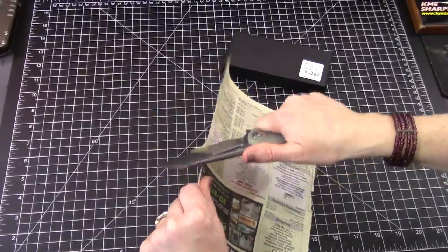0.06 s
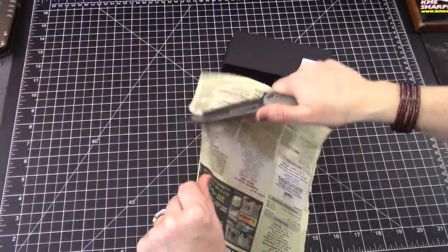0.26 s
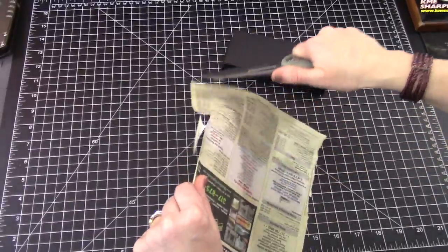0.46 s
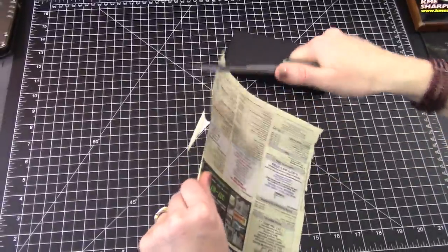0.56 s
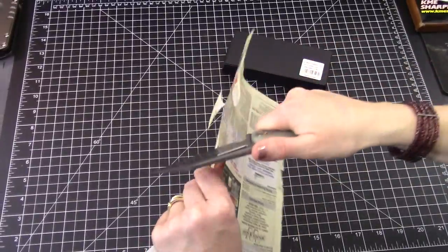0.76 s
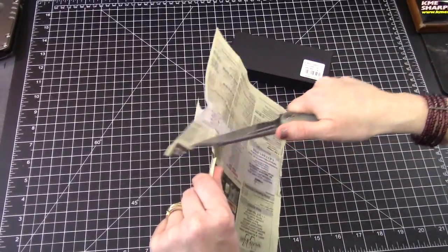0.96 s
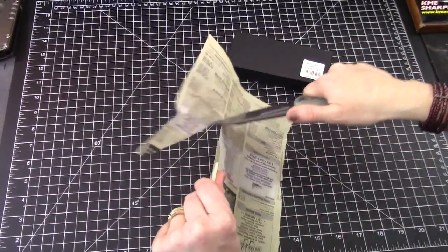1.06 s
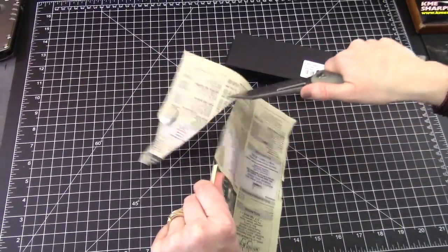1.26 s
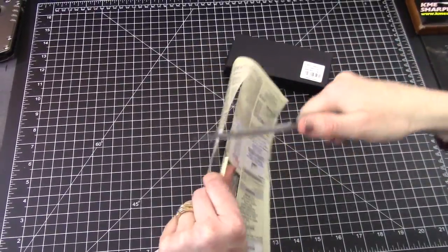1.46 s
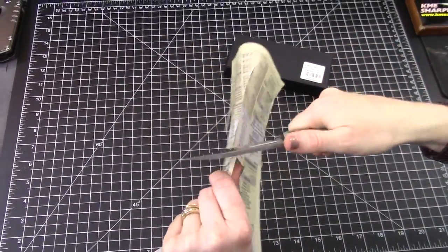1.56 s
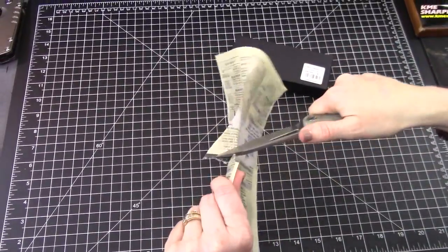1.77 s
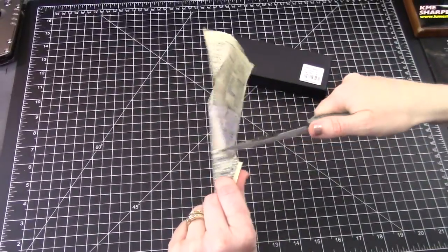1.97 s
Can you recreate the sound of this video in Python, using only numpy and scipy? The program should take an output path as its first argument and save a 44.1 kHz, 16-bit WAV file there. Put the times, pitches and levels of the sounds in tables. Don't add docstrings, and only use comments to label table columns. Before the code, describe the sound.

A knife slices thin newsprint, close and dry in a small quiet room. The first stroke is already under way at 0 s, builds to its hardest rip around 0.3 and fades by 0.5. Faint paper stirring follows, blade ticks at 0.77, then a bright steady slice from 0.84 to 1.27. The sheet settles; a lighter, uneven, snapping cut runs from 1.64 to about 2 s.

```python
import sys
import numpy as np
from scipy import signal
from scipy.fft import rfft, irfft
from scipy.io import wavfile
from scipy.ndimage import uniform_filter1d, map_coordinates

SR = 44100
rng = np.random.default_rng(int(sys.argv[2]) if len(sys.argv) > 2 else 0)


def int16_out(signal):
    q = np.round(np.clip(np.atleast_2d(signal).T, -1, 1) * 32767)
    wavfile.write(sys.argv[1], SR, q.astype(np.int16))


def gain_from_db(level_db):
    decades = np.asarray(level_db, float) / 20
    return 10 ** decades


N = 89037
SILENT_DB = -90


def unit(x):
    return x / np.sqrt(np.mean(x ** 2) + 1e-20)


def along(points, hz):
    f, v = np.transpose(points)
    return np.interp(np.log(hz + 1), np.log(f + 1), v)


def wobble(rate):
    return map_coordinates(rng.standard_normal(4000), [np.arange(N) * rate / SR])


def colour(x, points):
    gain = gain_from_db(along(points, np.fft.rfftfreq(4096, 1 / SR)))
    cepstrum = irfft(np.log(gain + 1e-6))
    cepstrum[1:2048] *= 2
    cepstrum[2049:] = 0
    return signal.fftconvolve(x, irfft(np.exp(rfft(cepstrum))))[:N]


def patches(x, patchy_db):
    z = signal.stft(x, nperseg=256)[2]
    field = uniform_filter1d(rng.standard_normal(z.shape), 3, 0)
    field = uniform_filter1d(field, 6, 1)
    return signal.istft(z * gain_from_db(patchy_db * unit(field)), nperseg=256)[1][:N]


def cracks(spike_db, clump_db, clump_rate):
    spikes = spike_db * np.minimum(rng.exponential(size=N), 4)
    clumps = clump_db * wobble(clump_rate)
    return rng.standard_normal(N) * gain_from_db(spikes + clumps)


RING_SPOTS_HZ = [1540, 1875, 2005, 2300, 2510, 2700]


def resonate(x, ring_hz, gain_db):
    width_hz = 420
    f, z = np.fft.rfftfreq(N, 1 / SR), rfft(x)
    place = np.interp(ring_hz, RING_SPOTS_HZ, np.arange(len(RING_SPOTS_HZ)))
    ringing = np.zeros(N)
    for k, centre in enumerate(RING_SPOTS_HZ):
        damping = 1j * f * width_hz
        peak = irfft(z * damping / (centre * centre - f * f + damping), N)
        ringing += np.sqrt(np.clip(1 - abs(place - k), 0, 1)) * peak
    return x + gain_from_db(gain_db) * ringing


# [t/s, cutting force level/dB, edge brightness level/dB,
# sheet flex level/dB, sheet ring f/Hz]
FIRST_STROKE = [
    [(0.0, -33, -19, 4.5, 1970), (.04, -26, -7.5, -10.5, 2250), (.07, -26.5, -5, -7.5, 2180),
     (.135, -23, -5, -10, 2210), (.2, -19.5, -5.5, -14.5, 1990), (.26, -20, -2.5, -13.5, 1940)],
    [(.266, -13, -4, -15, 2190), (.29, -12.5, -4, -20, 2080), (.32, -15.5, -10, -7, 2410),
     (.345, -13.5, -2, -16.5, 2700), (.375, -18.5, -5, -13.5, 2800), (.403, -29.5, -7.5, -3, 2360)],
    [(.425, -37.5, -27, 2.5, 2080), (.455, -31, -21, -17, 2340), (.475, -42.5, -30, 0, 2300),
     (.54, -64, -24, -5, 2100)],
]
SECOND_STROKE = [
    [(.8445, -16.5, -3.5, -23.5, 2720), (.885, -19.5, -4, -28, 2430), (.926, -23, -3.5, -19.5, 2370),
     (.995, -15.5, -4.5, -16, 1990), (1.06, -16.5, -4.5, -13, 2250)],
    [(1.088, -16, -5.5, -14.5, 2020), (1.15, -17.5, -6.5, -14.5, 2000), (1.225, -14.5, -6, -18, 2300),
     (1.243, -22, -4, -14.5, 2180), (1.265, -29.5, -7, -10.5, 2150)],
    [(1.3, -40.5, -20, -7.5, 1840), (1.325, -39, -25, -6, 1720), (1.385, -49.5, -14.5, 1, 1830),
     (1.43, -59, -10, 4, 1960)],
]
THIRD_STROKE = [
    [(1.643, -43, 2, -11, 2350), (1.653, -21, -2.5, -13, 2050), (1.71, -21, -3, -10.5, 1510),
     (1.79, -28, -0.5, -12, 2450), (1.825, -27.5, -5, -6.5, 1810)],
    [(1.86, -36.5, -1, -13.5, 1950), (1.89, -23.5, -3, -16, 2250), (1.92, -28.5, -3.5, -10, 1930),
     (1.952, -42, -7.5, -4, 1860), (1.975, -31, -5.5, -26, 1790), (1.99, -34.5, -7, -16, 2230),
     (2.019, -29, -13, 0, 2300)],
]


def stroke_curves():
    rows = []
    for phase in FIRST_STROKE + SECOND_STROKE + THIRD_STROKE:
        if rows and phase[0][0] - rows[-1][0] > .1:
            rows.append((rows[-1][0] + .03, SILENT_DB, *rows[-1][2:]))
            rows.append((phase[0][0] - .003, SILENT_DB, *phase[0][2:]))
        rows += [tuple(r) for r in phase]
    s, *columns = np.transpose(rows)
    return [np.interp(np.arange(N) / SR, s, c) for c in columns]


# [f/Hz, level/dB]
SHEET_TONE = [(500, -28.5), (1100, -3), (1600, -1), (2500, -5.5), (4000, -0.5), (5500, -13.5), (9000, -37)]
# [f/Hz, level/dB]
FIBRE_TONE = [(1000, -22), (2500, 1.5), (4000, -2), (6000, 0.5), (8000, -0.5), (11000, -7), (14000, -45),
              (16000, -46)]
# [f/Hz, level/dB]
FLEX_TONE = [(80, -29), (180, -13.5), (330, 6), (500, 1), (800, 2), (1200, -5), (2500, -15)]
# [f/Hz, level/dB]
SIZZLE_TONE = [(5000, -22), (9000, -6.5), (12000, -6), (16000, -14)]


def cut():
    force_db, bright_db, flex_db, ring_hz = stroke_curves()
    slip_db = force_db + 0.5 * wobble(61.6) + 0.19 * wobble(250)

    ring = colour(cracks(spike_db=2.5, clump_db=2.26, clump_rate=550), SHEET_TONE)
    ring_gain_db = 7.5 - 0.39 * np.clip(bright_db, -12, 0)
    ring = unit(patches(resonate(ring, ring_hz, ring_gain_db), patchy_db=2.5))

    hiss = colour(cracks(spike_db=0, clump_db=1.0, clump_rate=250), FIBRE_TONE)
    hiss = unit(patches(hiss, patchy_db=1.0))
    sizzle = unit(colour(cracks(spike_db=2.5, clump_db=4.5, clump_rate=200), SIZZLE_TONE))
    hiss = hiss + gain_from_db(5.5 + 4.7 * np.minimum(bright_db, 0)) * sizzle

    flex = colour(cracks(spike_db=0, clump_db=1.0, clump_rate=60), FLEX_TONE)
    flex = unit(patches(flex, patchy_db=1.5))

    dull = np.sqrt(np.clip(1 - 2.0 * gain_from_db(2 * bright_db), .1, 1))
    ring = gain_from_db(slip_db - 0.2) * dull * ring
    return ring + gain_from_db(slip_db - 2.25 + bright_db) * hiss + gain_from_db(slip_db + flex_db) * flex


# [t/s, peak level/dB]
PRICKS = [(0.1054, -14), (.1384, -18.5), (.1658, -13), (0.2, -11), (.2104, -27), (0.2302, -10),
          (0.2497, -21), (0.2713, -11), (0.2882, -20), (0.3183, 1), (0.3226, -17), (0.351, -10),
          (.3643, -9), (0.4073, -22), (0.4092, -19), (0.459, -28), (.8584, -28), (0.8704, -24),
          (.9283, -14), (.9437, -21), (0.9727, -22), (0.9902, -8.5), (1.0025, -14), (1.0319, -7),
          (1.0426, -27), (1.0713, -8), (1.078, -9), (1.0832, -6.5), (1.0878, -7), (1.093, -7.5),
          (1.1137, -14), (1.1195, -19), (1.1353, -3), (1.1473, -10), (1.166, -13), (1.1728, -7.5),
          (1.2068, -17), (1.227, -10), (1.6517, -17), (1.7066, -15), (1.7469, -31), (1.777, -22),
          (1.7914, -21), (1.991, -27), (2.007, -29)]
# [f/Hz, level/dB]
SPLIT_TONE = [(1500, -23), (4000, -8), (6500, 0.5), (10000, -3.5), (13000, -11), (16000, -22)]


def pricks():
    ring_hz, ring_t60_s = 2250, 0.0062
    edge_db, edge_t60_s = -0.5, 0.0065
    out, t = np.zeros(N + SR), np.arange(500) / SR
    for s, db in PRICKS:
        tune, sign = rng.standard_normal(2)
        ring = np.sin(2 * np.pi * ring_hz * (1 + .12 * tune) * t)
        ring *= gain_from_db(-60 * t / ring_t60_s) * (1 - np.exp(-t / .0003))
        edge = colour(rng.standard_normal(len(t)), SPLIT_TONE)[:len(t)]
        edge *= gain_from_db(edge_db - 60 * t / edge_t60_s)
        out[round(s * SR) - 8:][:len(t)] += gain_from_db(db) * (np.sign(sign) * ring + edge)
    return out[:N]


# [t/s, peak level/dB, brightness level/dB]
SNAPS = [(0.1384, -1.5, -17), (0.184, -7, -9.5), (0.1974, -9, -11), (0.264, -17, -9), (0.2678, -4.5, -1.5),
         (0.3268, 0.5, -4), (0.3522, -10, 0), (0.3695, -4.5, -4.5), (0.4064, -1, -40), (0.432, -12, -19),
         (0.4526, -9, -35), (0.4952, -23, -41), (0.7038, -37, -8), (1.2504, -14.5, -7),
         (1.2703, -12, -11.5), (1.3015, -37, -8), (1.3143, -27, -4), (1.322, -35, 3), (1.3564, -35, -4),
         (1.366, -33, -4), (1.6695, -9, -20), (1.6933, -11, -19), (1.704, -11, 1), (1.7213, -7.5, -1.5),
         (1.7515, -13, 1), (1.767, -7, -8.5), (1.7994, -5.5, -9.5)]
# [f/Hz, level/dB]
CRACK_TONE = [(300, -20.5), (1200, -7), (2200, -6.5), (4500, -7.5), (7000, -18.5), (12000, -42)]


def snaps():
    t60_s, rise_s = 0.023, .0004
    dull, bright, t = np.zeros(N + SR), np.zeros(N + SR), np.arange(4000) / SR
    for s, db, bright_db in SNAPS:
        i, noise = round(s * SR), rng.standard_normal((2, len(t)))
        fall = gain_from_db(db - 60 * t / t60_s) * (1 - np.exp(-t / rise_s))
        dull[i:i + len(t)] += fall * noise[0]
        bright[i:i + len(t)] += gain_from_db(bright_db) * fall * noise[1]
    return gain_from_db(2.0) * colour(dull, CRACK_TONE) + gain_from_db(1.5) * colour(bright, SPLIT_TONE)


# [t/s, level/dB, hold/s, decay t60/s, ring level/dB]
TICKS = [
    (0.7673, -23, 0.0038, 0.0097, -8.5),
    (0.7807, -11.5, 0.0009, 0.056, -3),
    (0.787, -22, 0.0037, 0.04, -21),
]
# [f/Hz, level/dB]
TICK_TONE = [(600, -34), (1300, -10), (2100, 0), (3400, -14), (4250, -7), (5400, -19), (7200, -16),
             (12000, -46)]
# [f/Hz, level/dB, decay t60/s]
TAUT_MODES = [(2000, 0, .03), (2420, -3, .02), (4200, -5, .022), (7200, -6, .009)]


def ticks():
    touch, t = np.zeros((3, N + SR)), np.arange(3000) / SR
    for s, db, hold, t60, ring_db in TICKS:
        after = np.maximum(t - hold, 0) / t60
        fall_db = np.array([-60 * after, -60 * after * 2.2, ring_db - 60 * after * 8])
        noise = rng.standard_normal((3, len(t)))
        touch[:, round(s * SR):][:, :len(t)] += gain_from_db(db + fall_db) * noise
    modes = sum(gain_from_db(db - 60 * t / t60) * np.cos(2 * np.pi * hz * t) for hz, db, t60 in TAUT_MODES)
    scrape = colour(touch[0], TICK_TONE[:5] + [(6000, -46)])
    scrape = scrape + colour(touch[1], TICK_TONE[:7] + [(12000, -48)])
    ring = signal.fftconvolve(touch[2], modes)[:N]
    return gain_from_db(0.5) * scrape + gain_from_db(-22.5) * ring


# [t/s, peak level/dB, f/Hz, length/s]
POPS = [(0, -32.5, 169, 0.014), (0.006, -26.5, 422, 0.017), (0.033, -20, 486, 0.006),
        (0.306, -20.5, 810, .012), (.325, -14, 754, 0.0088), (1.097, -18.5, 5330, 0.014),
        (1.391, -41, 431, 0.03), (1.405, -44, 412, 0.019), (1.556, -33.5, 525, 0.027),
        (1.738, -20.5, 3900, .007), (1.797, -27.5, 426, 0.011), (1.988, -33.5, 430, 0.035)]


def pops():
    out = np.zeros(N + SR)
    for s, db, hz, length in POPS:
        t = np.arange(round(length * SR)) / SR
        swell = np.sin(np.pi * (t / length) ** 0.5) ** 2
        out[round(s * SR):][:len(t)] += gain_from_db(db) * swell * np.sin(2 * np.pi * hz * t)
    return out[:N]


# [t/s, crackle level/dB, whisper level/dB]
STIR = [(.5, -50, -67), (.54, -62, -55), (.57, -57, -57), (.598, -54.5, -62), (0.605, -39.5, -55),
        (.65, -64, -66), (.69, -53, -55.5), (.71, -48, -56), (.75, -54, -55), (.83, -51, -56),
        (.9, -74, -72), (1.29, -72, -56), (1.36, -67, -60), (1.46, -55, -55.5), (1.5, -56, -55.5),
        (1.535, -59, -58), (1.6, -61, -60.5), (1.66, -78, -77)]
# [f/Hz, level/dB]
WHISPER_TONE = [(1500, -9), (4000, -2.5), (9000, -3), (12000, -13), (16000, -18)]


def stir():
    s, *columns = np.transpose([(.46, SILENT_DB, SILENT_DB)] + STIR)
    crackle_db, whisper_db = [np.interp(np.arange(N) / SR, s, c) for c in columns]
    crackle = cracks(spike_db=2.5, clump_db=4.0, clump_rate=200)
    crackle = unit(colour(crackle, TICK_TONE[:4] + [(7000, -44)]))
    whisper = unit(colour(cracks(spike_db=1, clump_db=1.0, clump_rate=120), WHISPER_TONE))
    return gain_from_db(crackle_db) * crackle + gain_from_db(whisper_db) * whisper


# [f/Hz, t60/s]
ROOM_T60 = [(200, 0.17), (2000, 0.11), (10000, 0.012)]


def room(x):
    hz, t, z = signal.stft(rng.standard_normal((2, SR // 2)), SR, nperseg=256)
    t60 = np.clip(along(ROOM_T60, hz), .02, 1)[:, None]
    tail = signal.istft(z * gain_from_db(-60 * t / t60), SR, nperseg=256)[1]
    tail = tail / np.linalg.norm(tail[0])
    late = np.pad(x, (250, 0))[None]
    return signal.fftconvolve(late, tail, axes=1)[:, :N]


# [f/Hz, level/dB per Hz]
AIR_TONE = [(15, -56), (25, -16), (249, 8), (405, 4.5), (531, 3), (1160, -2.5), (5570, -17.5),
            (6920, -21.5), (16000, -34)]


def air():
    hush = colour(rng.standard_normal(N), AIR_TONE)
    return gain_from_db(-50) * unit(patches(hush, patchy_db=0.5))


# [f/Hz, level/dB]
APART = [(60, -24), (290, -28.5), (900, -29), (2200, -35.5), (3500, -29.5), (5500, -15.5), (8000, -28.5),
         (11000, -29.5), (15000, -22)]


def scene():
    paper = cut() + stir() + snaps() + ticks() + pricks()
    bass_cut = signal.butter(3, 148, 'high', fs=SR, output='sos')
    paper, pop = signal.sosfilt(bass_cut, paper), pops()
    wet, other_wet = room(paper + gain_from_db(-14) * pop)
    mid = paper + pop + gain_from_db(-13) * wet + air()
    side = colour(other_wet + gain_from_db(18.0) * air(), APART)
    return np.array([mid + side, mid - side])


def top_cut(x):
    return signal.sosfilt(signal.butter(12, 16620, fs=SR, output="sos"), x)


def record(dry):
    ceiling, low_hz, top_hz = .85, 47.6, 15750
    f = np.fft.rfftfreq(N, 1 / SR)
    soft = dry / (1 + abs(dry / ceiling) ** 4) ** .25
    band = (f < top_hz) * f ** 4 / (f ** 4 + low_hz ** 4)
    limited = irfft(rfft(soft) * band, N)
    return top_cut(limited)


dry = scene()
out = record(dry)
int16_out(out)
```